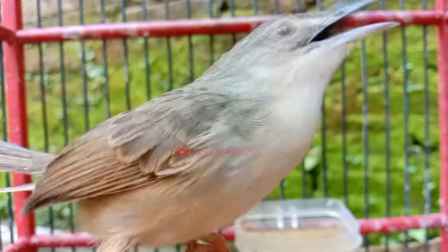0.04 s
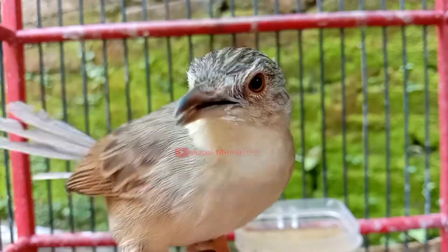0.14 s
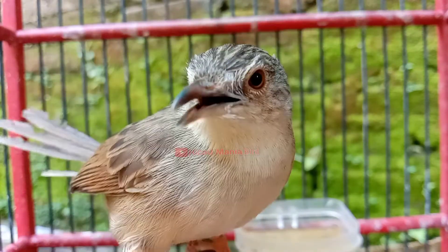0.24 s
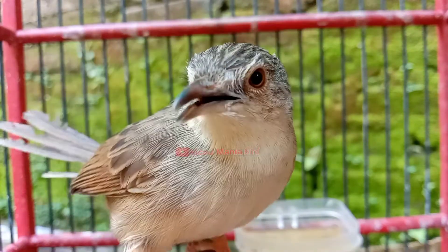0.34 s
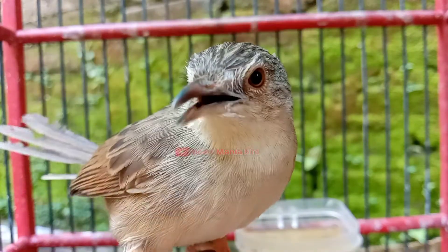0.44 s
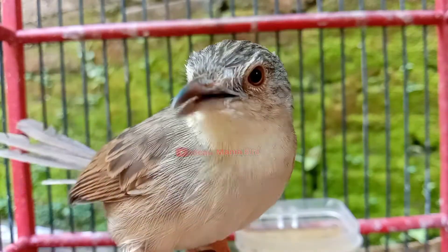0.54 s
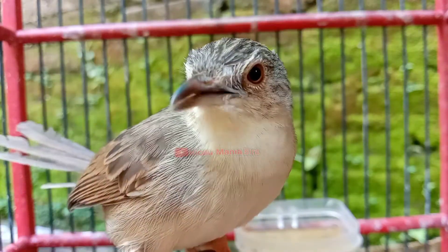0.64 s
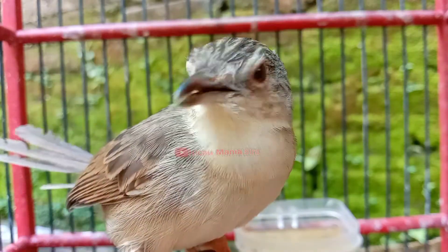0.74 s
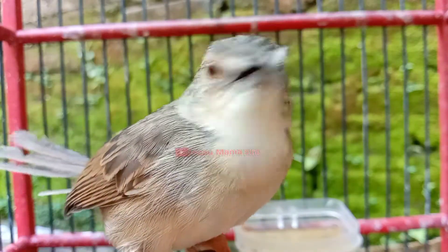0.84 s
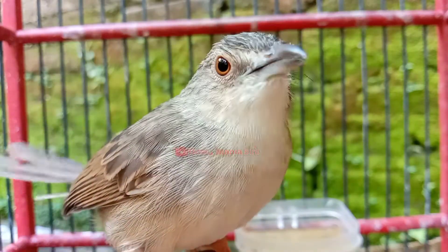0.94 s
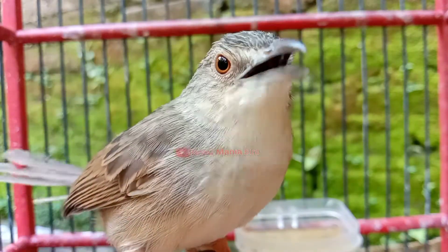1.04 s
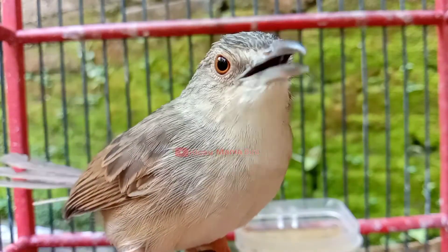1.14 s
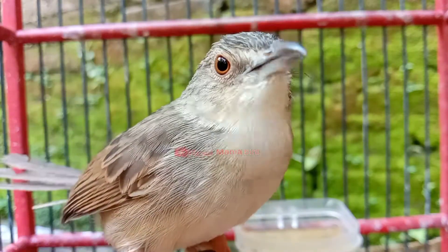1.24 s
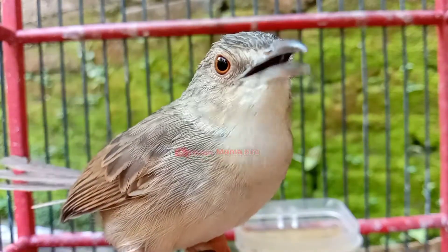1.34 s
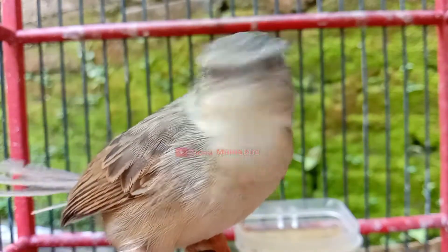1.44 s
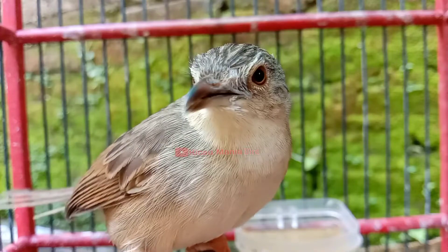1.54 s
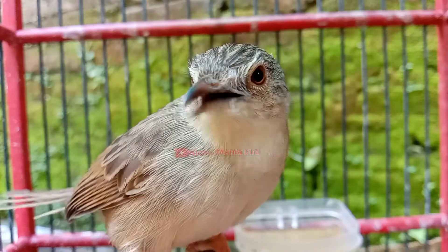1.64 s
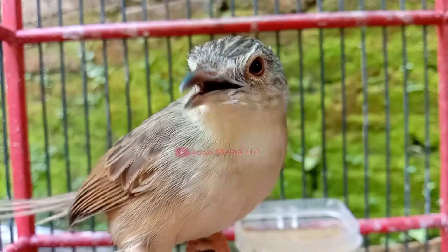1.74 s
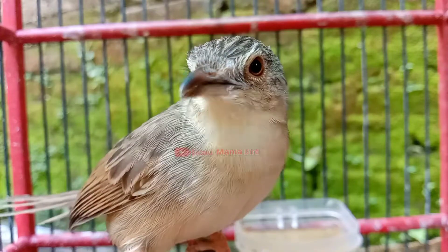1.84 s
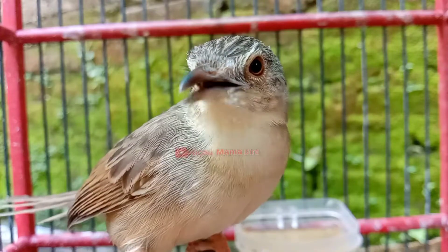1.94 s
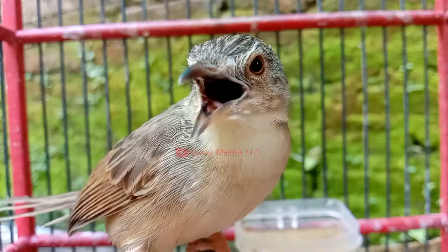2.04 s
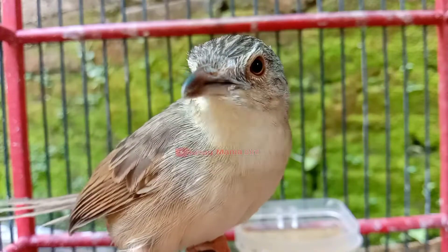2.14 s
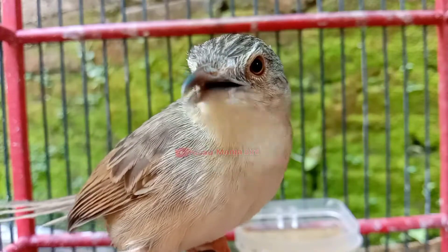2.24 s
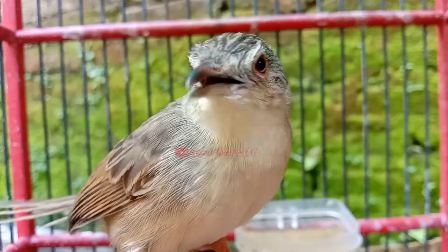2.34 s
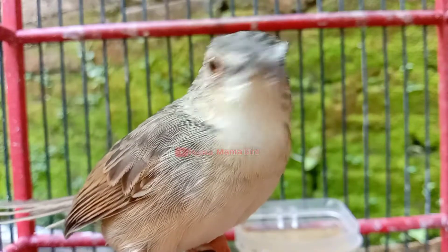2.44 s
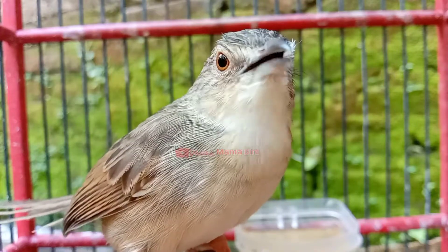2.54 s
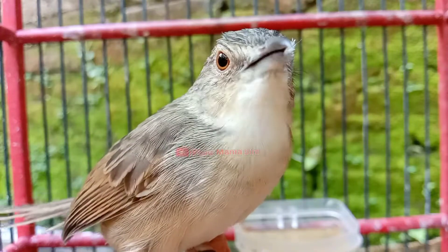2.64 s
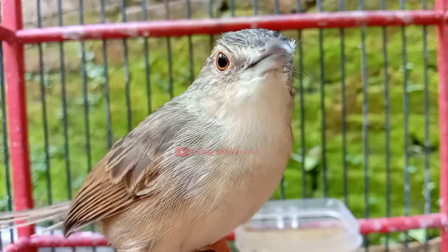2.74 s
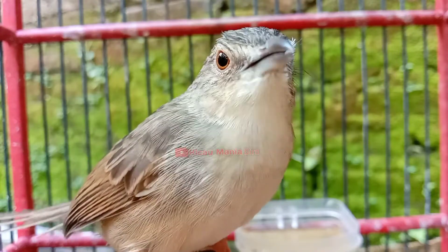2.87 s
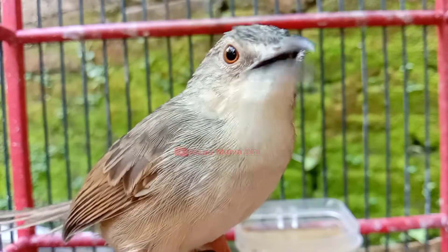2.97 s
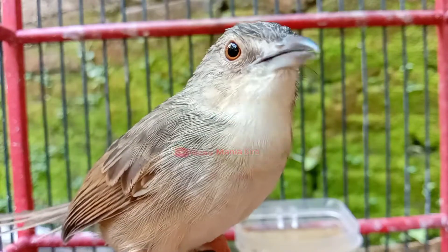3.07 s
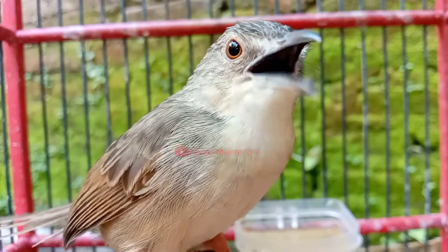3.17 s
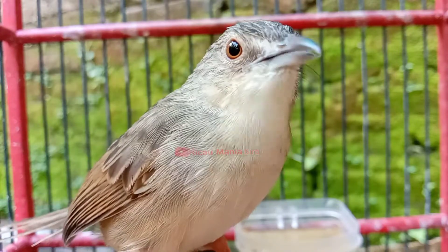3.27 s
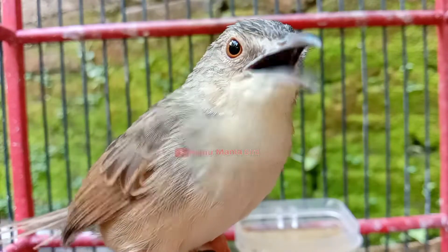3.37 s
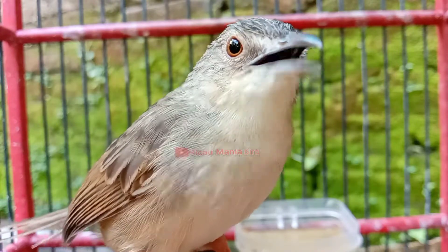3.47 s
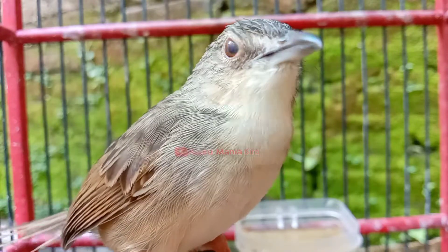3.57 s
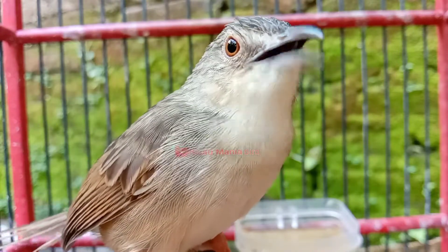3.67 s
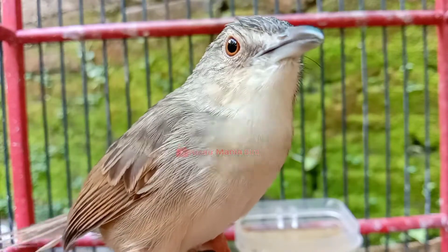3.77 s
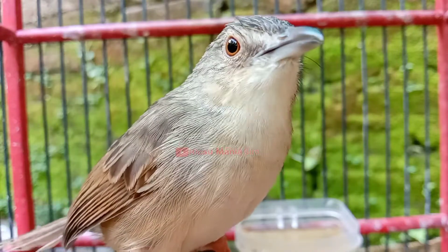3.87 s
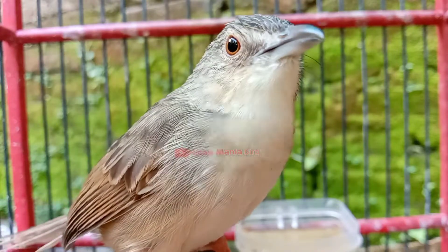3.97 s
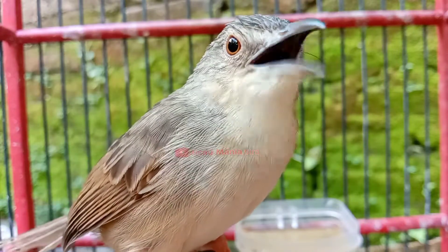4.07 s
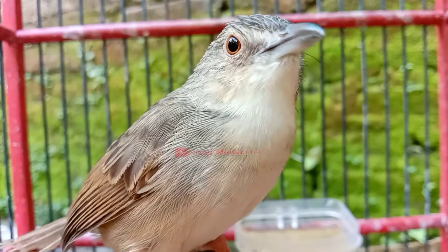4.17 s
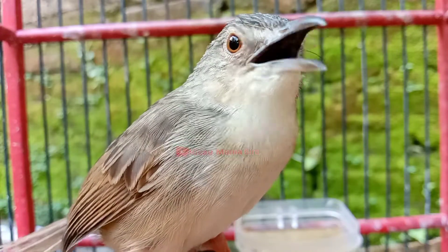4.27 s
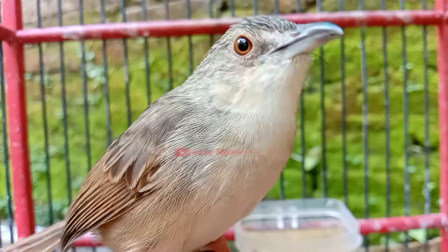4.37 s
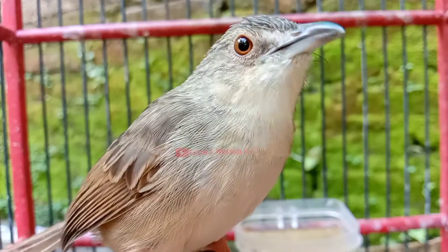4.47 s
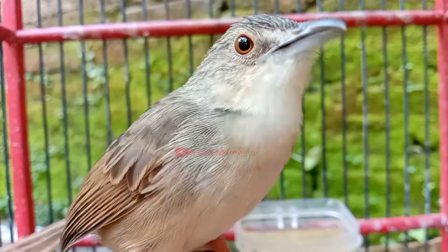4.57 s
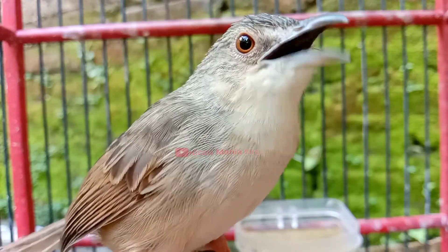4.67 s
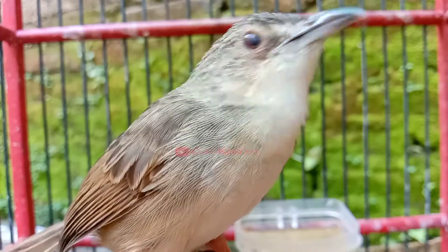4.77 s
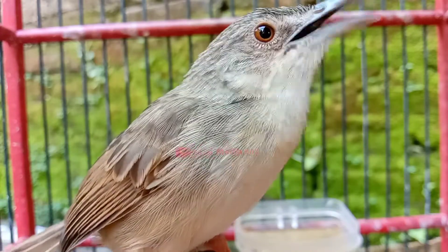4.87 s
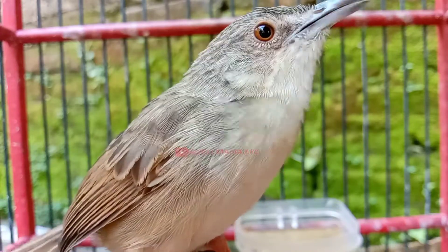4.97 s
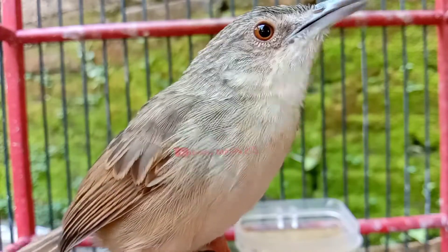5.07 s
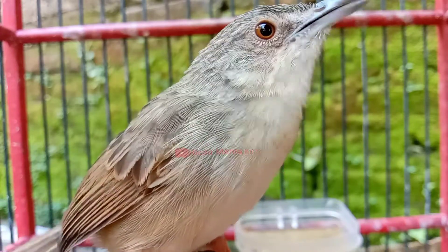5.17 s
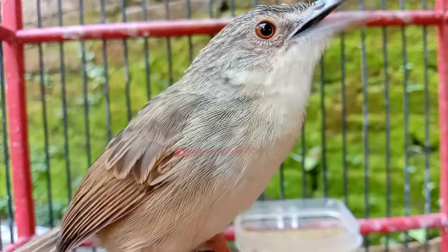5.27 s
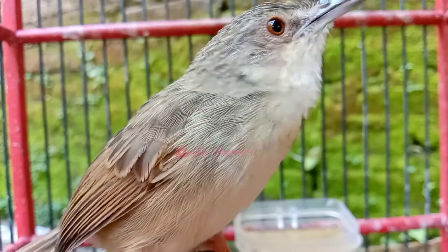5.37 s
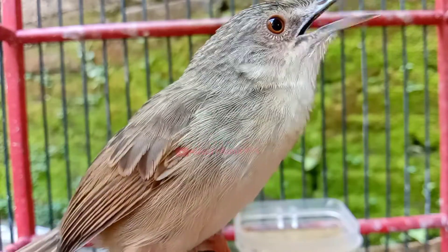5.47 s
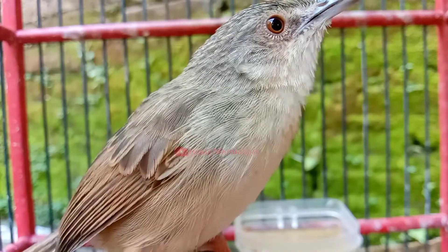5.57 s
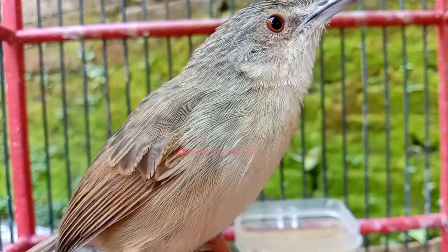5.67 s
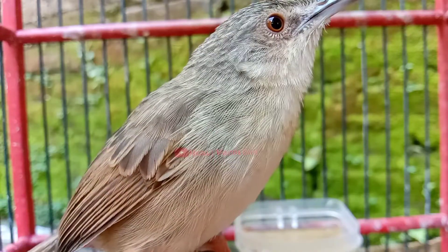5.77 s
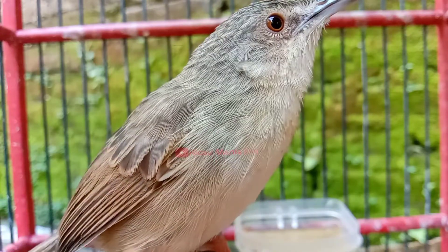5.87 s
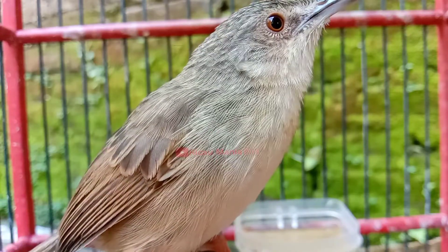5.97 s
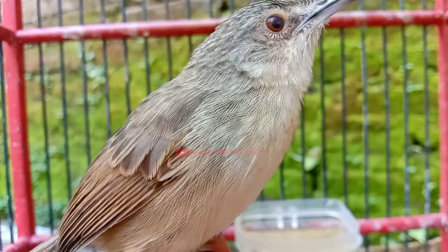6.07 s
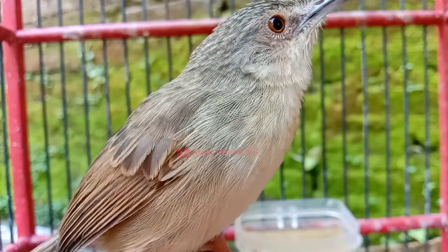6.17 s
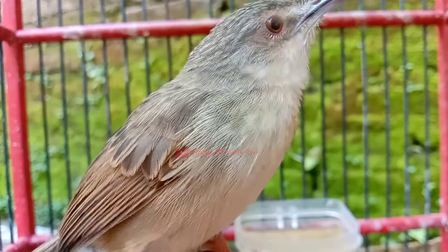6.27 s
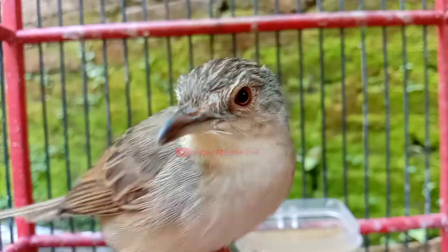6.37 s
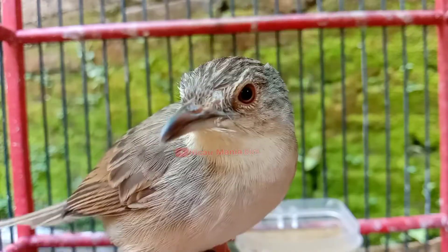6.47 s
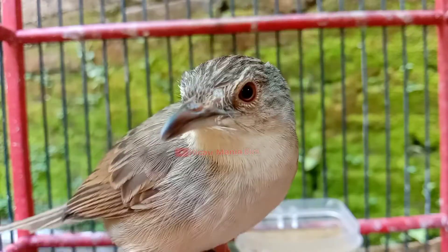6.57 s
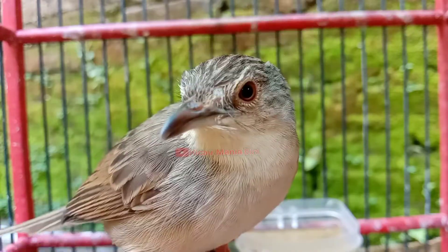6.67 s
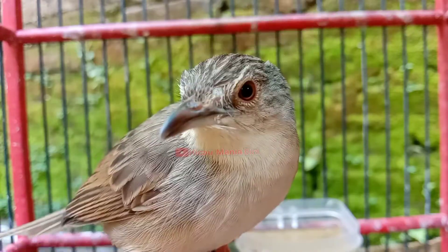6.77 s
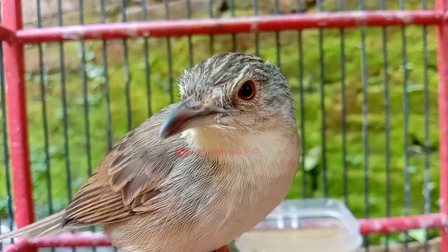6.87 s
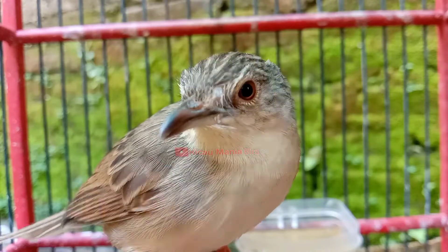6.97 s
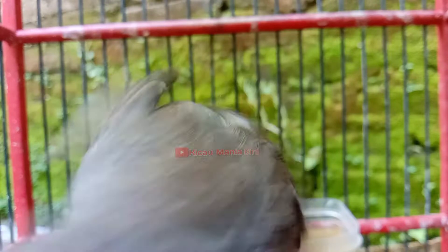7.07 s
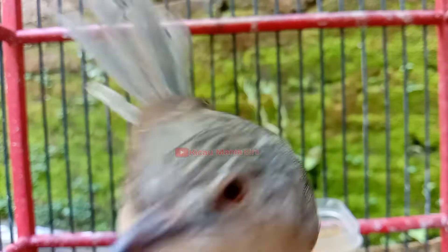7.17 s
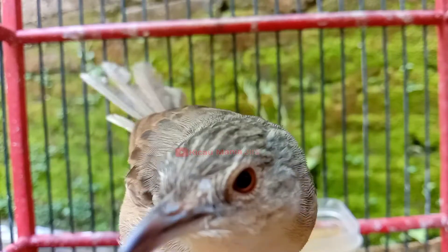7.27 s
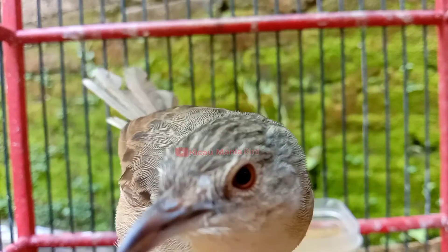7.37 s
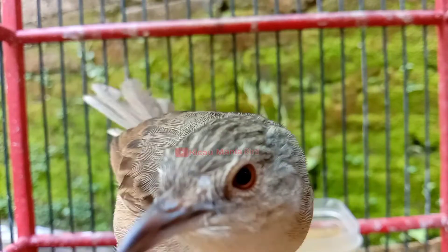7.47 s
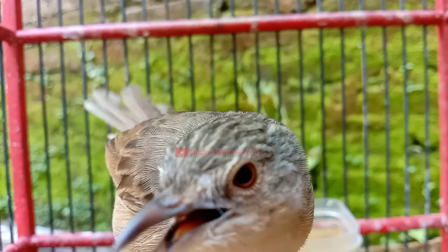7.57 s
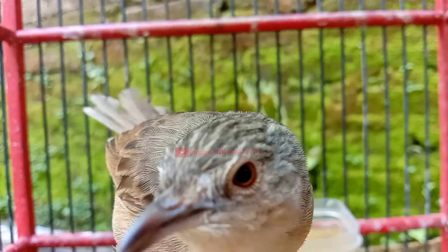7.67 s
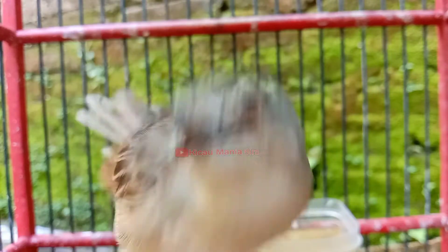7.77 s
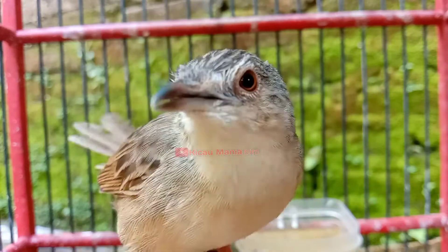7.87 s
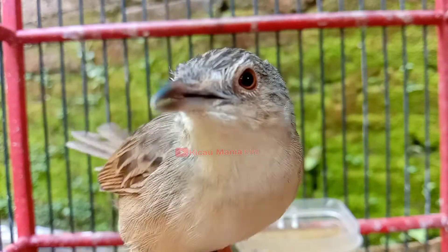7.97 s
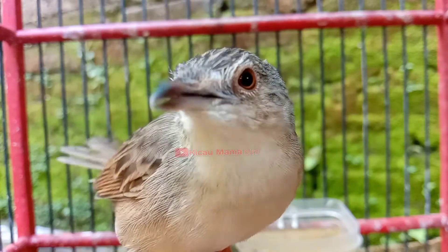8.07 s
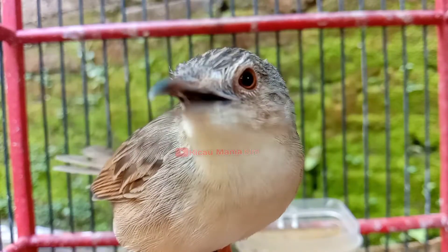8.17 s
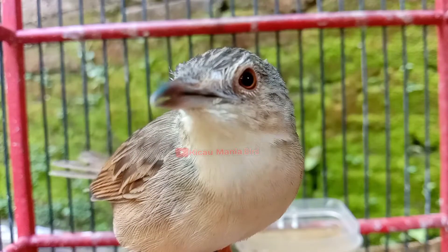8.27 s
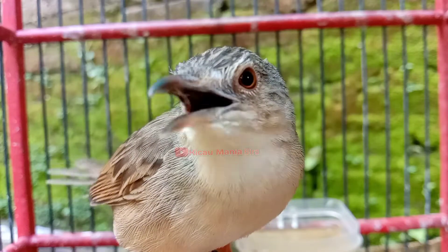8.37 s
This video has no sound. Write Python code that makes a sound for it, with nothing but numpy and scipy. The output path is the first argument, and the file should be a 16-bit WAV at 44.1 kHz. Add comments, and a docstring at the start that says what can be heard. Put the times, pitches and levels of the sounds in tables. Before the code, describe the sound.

In a yard beside a street, a phone's microphone sits close to a small caged bird. The sound opens on the tail of a phrase, its buzz ending near 0.2 s. From 0.5 s the phrase returns about every 0.6 s: a falling click-like chip, a slur darting up and down, then a rising whistle breaking into a harsh, rapid buzz around 5 kHz. It is loud, piercing, slightly clipped, with short cage and wall echoes. Low traffic rumble and faint hums waver behind; a soft hiss passes early, and a rough far call hides near 1.6 s. The run ends around 5.6 s. Feathers flutter briefly at 5.7 s, a faint pulsing far whistle sounds at 6.5 s, and feet tap and scrape the wooden perch, lightly at 6.4, more clearly from 6.9 to 7.2 s. A softer phrase comes at 7.4 s, a stronger one at 8.0 s, cut off as its buzz finishes.

```python
"""A yard beside a street, a phone's microphone close to a small caged bird that repeats one phrase: a falling chip,
a slur up and down, a rising whistle that breaks into a buzz. The notes are gliding partials; delays and a noise
tail make the echoes of cage and walls, and the loudest notes clip. Behind: knocks of the perch and shaken feathers
(noise through resonances and spectra), a far bird (wavering tones), traffic rumble and a passing hiss (shaped
noise), and wavering hums (sines)."""
import sys
import numpy as np
from scipy import signal
from scipy.fft import rfft, irfft, next_fast_len
from scipy.io import wavfile
from scipy.ndimage import uniform_filter1d, map_coordinates

SR = 44100
rng = np.random.default_rng(int(sys.argv[2]) if len(sys.argv) > 2 else 0)


def put_to_file(sound):
    """Save the sound as 16-bit audio at rate SR, in the file named by the first command-line argument."""
    columns = np.atleast_2d(sound).T  # one column per channel
    safe = np.clip(columns, -1, 1)
    whole_steps = np.round(safe * 32767)
    wavfile.write(sys.argv[1], SR, whole_steps.astype(np.int16))


N = 370881  # samples


def amp(db):
    """Level in dB to linear gain."""
    return 10 ** (np.asarray(db) / 20)


def unit(x):
    """x scaled to rms 1."""
    return x / np.sqrt(np.mean(x ** 2) + 1e-20)


def along(points, hz):
    """Reads (f/Hz, value) points on a log frequency axis."""
    f, v = np.transpose(points)
    return np.interp(np.log(hz + 1), np.log(f + 1), v)


def curves(rows, t):
    """Each column after the time, read at times t."""
    s, *cols = np.transpose(rows)
    return [np.interp(t, s, c) for c in cols]


def wobble(rate, size=N):
    """A smooth random curve, rate knots a second."""
    knots = rng.standard_normal(size=500)
    return map_coordinates(knots, [np.arange(size) * rate / SR], mode="wrap")


def filtered(x, response):
    """x times a complex response of frequency."""
    m = next_fast_len(N + SR // 2)
    return irfft(rfft(x, m) * response(np.fft.rfftfreq(m, 1 / SR)), m)[..., :N]


def rush(spectrum, patchy_db):
    """Noise of rms 1 in a given spectrum, with patches of random gain in time and frequency."""
    z = signal.stft(rng.standard_normal(N + 512), nperseg=512)[2]
    field = uniform_filter1d(rng.standard_normal(z.shape), 4, 0)  # across frequency
    field = uniform_filter1d(field, 14, 1)  # across time
    noise = signal.istft(z * amp(patchy_db * unit(field)), nperseg=512)[1][:N]
    return unit(filtered(noise, lambda hz: amp(along(spectrum, hz))))


def add(out, s, x):
    """Mixes x into out from time s on."""
    i = round(s * SR)
    part = x[max(-i, 0):len(out) - i]
    out[max(i, 0):][:len(part)] += part


# The four notes, close to the microphone; phrase and note gains are added to the levels. Columns:
# t/s from the note's moment, strong partial f/Hz, its level/dB, weak partials' level/dB relative to it
CHIP = [(-.006, 8011, -48.5, -39.5), (-.003, 7657, -21.5, -38), (0, 6537, -8, -37), (.004, 5246, -4, -39),
        (.008, 4150, -2.5, -35), (.018, 2097, -26.5, -44), (.025, 1287, -47, -50), (.03, 1118, -78, -40)]  # t from the chip
SLUR = [(-.024, 2004, -85.5, -15), (-.019, 2504, -43, -3.5), (-.014, 3685, -15.5, -12),
        (-.009, 5215, -11.5, -20), (-.003, 7377, -8.5, -32.5), (.003, 7528, -9, -34.5),
        (.015, 6590, -8.5, -33.5), (.035, 4404, -19, -13.5), (.048, 3650, -13, -15.5),
        (.065, 3063, -15.5, -32), (.08, 2800, -21, -13.5), (.091, 2503, -24, -12.5),
        (.098, 1963, -36.5, -12.5), (.106, 1415, -65.5, -21.5)]  # t from the slur's top
RISE = [(-.08, 1312, -54, -12.5), (-.0715, 1999, -31.5, -18), (-.0655, 2494, -24, -17.5),
        (-.0575, 2944, -14, -27.5), (-.0495, 3250, -11, -27.5), (-.0375, 3485, -12, -21),
        (-.0265, 3925, -9, -22), (-.0185, 4674, -16, -16), (-.0125, 5470, -13, -13.5)]  # t from the buzz beat
BUZZ = [(-.0095, 5050, -10, -24), (.0075, 5320, -5.5, -27.5), (.03, 5433, -3.5, -29.5),
        (.045, 5050, -5, -28.5), (.062, 3900, -6, -26.5), (.078, 3000, -15.5, -25.5),
        (.0885, 2250, -30.5, -17), (.0985, 2000, -69, -36)]  # t from the buzz beat at the usual warble rate; f is the warble's centre
# Weak partials: multiple of the strong one's f, level/dB added to the weak level of the note
WEAK_PARTIALS = [(.5, -5.5), (1.5, -4), (2, -9.5), (2.5, -43.5), (3, -42)]
# Extra level/dB of the weak partials above the strong one: chip, slur, rise, buzz
UPPER_DB = [-4.8, 5, -7.5, 12]
# The throat passes the upper partials: f/Hz, gain/dB
THROAT = [(2500, -7.5), (3500, 1), (4400, 0), (5500, -6.5), (6700, 2.6), (7600, -17.5), (12000, -19.5)]
USUAL_WARBLES = 121.5  # per s
WARBLE_SHARE, WARBLE_GATE_DB = 0.22, 16.5  # scale of the pitch swing over pitch, level dip of each beat
WARBLE_JITTER = .2  # radians


def phrase(top, beat, rate, *notes_db):
    """Four notes, each hung on its own moment; in the buzz the pitch saws down loud and climbs back faint."""
    t = np.arange(SR // 2) / SR - .01  # s from the chip
    buzz = [(s * USUAL_WARBLES / rate, *rest) for s, *rest in BUZZ]  # a slower warble draws the buzz out
    rows = []
    for shape, at, gain, up in zip([CHIP, SLUR, RISE, buzz], [0, top, beat, beat], notes_db, UPPER_DB):
        rows += [(at + s, f, db + gain, under, under + up) for s, f, db, under in shape]
    hz, db, under_db, upper_db = curves(rows, t)

    buzzing = np.interp(t - beat, [RISE[-1][0], BUZZ[0][0]], [0, 1])
    beat_phase = 2 * np.pi * rate * (t - beat) + 1.3 + WARBLE_JITTER * wobble(70, size=len(t))
    saw = np.cos(beat_phase) - 0.34 * np.sin(2 * beat_phase)
    dip_db = WARBLE_GATE_DB * (np.sin(beat_phase - .1) - 1) / 2
    gate_db = buzzing * (dip_db + 0.93 * wobble(400, size=len(t)))

    bend = 1 + .006 * wobble(300, size=len(t)) + buzzing * WARBLE_SHARE * saw
    phase = 2 * np.pi * np.cumsum(hz * bend) / SR
    voice = np.sin(phase)
    for k, level in WEAK_PARTIALS:
        weak_db = upper_db + along(THROAT, k * hz) if k > 1 else under_db
        voice = voice + amp(weak_db + level) * np.sin(k * phase) * (k * hz < SR / 2.5)
    return amp(db + gate_db + 1.1 * wobble(120, size=len(t))) * voice


# The yard's reverberation: f/Hz, t60/s before the scale given by each use
YARD = [(1000, 0.14), (3000, .35), (5000, 0.37), (6200, 0.36), (7500, 0.27), (10000, 0.052)]


def tail(x, t60_scale):
    """Decaying noise as the yard's answer: each frequency dies at its own speed."""
    hz, t, z = signal.stft(rng.standard_normal(SR // 2), SR, nperseg=128)
    z = z * amp(-60 * t / (t60_scale * along(YARD, hz)[:, None]))
    answer = signal.istft(z, SR, nperseg=128)[1]
    late = np.pad(x, (170, 0))  # starts 170 samples late
    return signal.fftconvolve(late, answer / np.linalg.norm(answer))


# The phrases: chip t/s, slur top t/s after it, buzz beat t/s after it, warble rate/per s,
# gains of chip, slur, rise and buzz/dB, thump drive level/dB
SONG = [(-0.285, .12, .3091, 123.0, 0.0, 0.0, 0.0, -0.7, -60),
        (0.4887, .1222, .3097, 122.0, -1.7, -2.9, -0.7, -0.1, -56),
        (1.0822, .1228, .3073, 120.5, 0.8, 1.2, 2.2, 0.9, -44),
        (1.6932, .1242, .3111, 122.0, -0.6, 0.3, 2.2, 0.8, -41),
        (2.2661, .1222, .312, 125.5, -0.4, 0.1, 1.8, 0.6, -49),
        (2.8331, .121, .3098, 120.5, -0.1, 1.1, 0.9, 0.2, -50),
        (3.3963, .12, .3074, 119.0, 0.0, 0.0, 0.0, 0.0, -51),
        (3.9643, .1239, .3131, 122.0, -0.2, 0.0, -0.5, -0.2, -49),
        (4.5556, .1247, .3189, 120.0, -0.6, -0.2, -0.4, -0.8, -49),
        (5.127, .1253, .3159, 117.0, -0.7, 1.2, -0.8, -0.9, -54),
        (7.4354, .1471, .3345, 124.5, -4.1, -6.5, -5.8, -1.6, -60),
        (8.034, .1262, .3166, 122.5, -1.0, -2.9, -3.0, -1.6, -54)]
# Near echoes off cage, perch and table: delay/ms, signed share of the direct sound
ECHOES = [(0.391, 0.043), (0.739, 0.056), (0.944, -0.31), (1.204, 0.26), (1.421, 0.25), (2.414, 0.19),
          (2.824, 0.17), (3.152, 0.31), (3.512, -0.21), (4.85, 0.16)]
# Treble noise on the high notes: f/Hz, relative density/dB per Hz
SPLASH = [(6500, -34), (7800, -6), (10000, -2.5), (11500, -2.5), (13000, -6.5), (15000, -3.5),
          (16000, -14.5)]
# The low thump under each chip: f/Hz, relative density/dB per Hz
THUMP_TONE = [(200, -30), (380, -6), (550, -4), (750, 0), (1000, -6), (1500, -12), (2500, -40)]
THUMP_S = .022


def singer():
    """All phrases with fixed near echoes, the yard's tail, treble noise on high notes, a thump under each chip."""
    direct, wet, thump = np.zeros((3, N))
    for chip, *row, thump_db in SONG:
        add(thump, chip - THUMP_S / 2, amp(thump_db) * np.hanning(round(THUMP_S * SR)))
        notes = phrase(*row)
        answer = amp(-17.5) * tail(notes, t60_scale=0.57) + amp(-28) * tail(notes, t60_scale=0.98)
        add(direct, chip - .01, notes)
        add(wet, chip - .01, answer)

    def near(hz):
        """Direct sound plus its delayed copies."""
        return 1 + sum(share * np.exp(-2j * np.pi * hz * ms / 1000) for ms, share in ECHOES)

    song = filtered(direct, near) + wet
    high = filtered(song, lambda hz: 1 / (1 + (4800 / (hz + 1)) ** 8))
    loudness = np.sqrt(np.abs(uniform_filter1d(high ** 2, size=350)))
    splash_level = amp(-30.5) * loudness ** 0.87 * amp(2.5 * wobble(13))
    splash = splash_level * rush(SPLASH, patchy_db=5)
    return song + splash + thump * rush(THUMP_TONE, patchy_db=2.5)


# Feet on the perch: t/s, drive level/dB before the wood's response, rustle level over it/dB
KNOCKS = [(6.4424, -43, -24), (6.8551, -34, -22), (6.8749, -37, -25.5), (7.078, -26, -27),
          (7.0903, -25.5, -16.5), (7.1325, -48.5, -23), (7.1721, -38, -30.5), (7.2481, -46, -36)]
# Resonances of the perch: f/Hz, width/Hz, gain/dB
PERCH = [(796, 39, -6.5), (1304, 83, 3), (1460, 46, -2.5), (1790, 100, -3.5), (2060, 160, -11.5),
         (2400, 120, -12), (3880, 490, -10.5)]
KNOCK_T60_S = 0.12  # of the scrape; the rustle dies twice as fast


def knocks():
    """Feet scrape the perch: noise bursts ring its resonances, with a dry rustle."""
    scrape, rustle, t = np.zeros(N), np.zeros(N), np.arange(SR // 8) / SR
    for s, db, rustle_db in KNOCKS:
        fade = amp(-60 * t / KNOCK_T60_S)
        shape = amp(db) * fade * (1 - np.exp(-t / .002))
        add(scrape, s, shape * rng.standard_normal(len(t)))
        add(rustle, s, amp(rustle_db) * fade * shape * rng.standard_normal(len(t)))

    def wood(f):
        """Resonances in parallel, with alternating sign."""
        return sum((-1) ** k * amp(db) * 1j * f * width / (centre ** 2 - f * f + 1j * f * width)
                   for k, (centre, width, db) in enumerate(PERCH))

    return filtered(scrape, wood) + filtered(rustle, lambda f: f / (f + 1500))


# Feathers shaken once: start t/s, end t/s, mean level/dB
RUFFLE = (5.69, 5.86, -59)
# Their spectrum: f/Hz, relative density/dB per Hz
RUFFLE_TONE = [(900, -27.5), (1500, -19), (2000, 4), (2800, -2), (3700, 8), (4500, -9), (5750, 4),
               (7500, -14), (10000, -16), (15500, -27)]


def feathers():
    """One shake of the feathers: a short burst of patchy noise with an unsteady level."""
    start, end, db = RUFFLE
    shake = np.interp(np.arange(N) / SR, [start, start + 0.015, end - .03, end], [0, 1, 1, 0])
    return amp(db + 3 * wobble(49)) * shake * rush(RUFFLE_TONE, patchy_db=4.5)


# Far whistle: t/s, f/Hz, level/dB about which it pulses
FAR_WHISTLE = [(6.488, 2500, -50), (6.497, 2850, -39), (6.512, 2980, -37), (6.535, 3110, -32),
               (6.565, 3070, -38), (6.6, 3095, -38), (6.652, 3100, -52), (6.76, 3110, -70)]
# Its overtones: multiple of f, level under the whistle at its start/dB, fading/dB per s
FAR_OVERTONES = [(2, -14, 150), (3, -36, 150)]
# Rough far call, a low note then a higher one: t/s, f/Hz, level/dB about which it flutters
CHATTER = [(1.53, 2250, -56), (1.56, 2230, -44), (1.618, 2220, -46), (1.626, 2830, -40), (1.666, 2800, -36),
           (1.695, 2830, -35)]
FAR_PULSES, FAR_PULSE_DB, FAR_PULSE_S = 33, 4, 6.548  # per s, swing either way, moment of one crest
FAR_WAVER = .009  # pitch share


def far_birds():
    """A pulsing whistle whose overtones fade first, smeared by the yard, and a fluttering rough call."""
    out = np.zeros(N)
    t = np.arange(SR // 3) / SR + FAR_WHISTLE[0][0]
    hz, db = curves(FAR_WHISTLE, t)
    phase = 2 * np.pi * np.cumsum(hz * (1 + FAR_WAVER * wobble(110, size=len(t)))) / SR
    tone = np.sin(phase)
    for k, under, fade in FAR_OVERTONES:
        tone = tone + amp(under - fade * (t - t[0])) * np.sin(k * phase)
    pulse_db = FAR_PULSE_DB * np.cos(2 * np.pi * FAR_PULSES * (t - FAR_PULSE_S))
    onset = 1 - np.exp((t[0] - t) / 0.0034)
    whistle = amp(db + pulse_db) * (t < FAR_WHISTLE[-1][0]) * tone * onset
    add(out, t[0], whistle)
    add(out, t[0], amp(-7) * tail(whistle, t60_scale=0.44))

    t = np.arange(SR // 6) / SR + CHATTER[0][0]
    hz, db = curves(CHATTER, t)
    # fast random pitch makes the call rough
    phase = 2 * np.pi * np.cumsum(hz * (1 + 0.058 * wobble(698, size=len(t)))) / SR
    flutter_db = 3.9 * np.cos(2 * np.pi * 70 * t)
    add(out, t[0], amp(db + flutter_db) * np.sin(phase) * np.hanning(len(t)) ** 0.073)
    return out


# Street traffic: t/s, mean level/dB of rumble, of drone, of wash
TRAFFIC = [(0, -49, -55.5, -57.5), (.4, -40, -52, -56.5), (.8, -46, -54, -57), (1.25, -48.5, -58, -54),
           (1.6, -41.5, -55, -54.5), (1.8, -50, -51, -55.5), (2.65, -49.5, -57, -56.5),
           (3.0, -50.5, -50, -52), (3.8, -47.5, -51.5, -56.5), (4.1, -44.5, -47, -53), (4.7, -48, -51, -49),
           (5.2, -47.5, -59, -57), (5.8, -50.5, -56.5, -60), (6.3, -43, -59.5, -65),
           (6.85, -47, -61, -65.5), (7.05, -54, -67.5, -66), (8.2, -47, -56, -63), (8.41, -45.5, -56, -65)]
# Spectra of the three: f/Hz, relative density/dB per Hz
RUMBLE = [(12, -64.5), (20, -39.5), (38, -20), (52, -10), (70, 1), (103, -5), (156, -5.5), (184, -12.5),
          (230, -11.5), (300, -39.5), (510, -120)]
DRONE = [(120, -31), (200, -11.5), (258, -4), (323, 1), (398, -2), (472, -14), (520, -14), (680, -45.5),
         (1140, -120)]
WASH = [(420, -32.5), (520, -9), (650, -5.5), (800, -9), (1000, -10), (1250, -1), (1400, -9.5),
        (1900, -8.5), (2500, -14), (3800, -27), (5500, -24), (7400, -24.5), (8000, -39), (15500, -35.5)]
# Passing hiss: t/s, mean level/dB
HISS = [(0, -49.5), (.15, -46.5), (.45, -40.5), (1.6, -63.5), (3, -56), (5.6, -63), (5.9, -77.5),
        (8.41, -83)]
# Its spectrum: f/Hz, relative density/dB per Hz
HISS_TONE = [(1350, -61), (2300, -25.5), (2700, -10.5), (3590, -0.5), (4520, -10), (5540, -15),
             (6360, -30.5), (7530, -31), (8200, -42.5), (9400, -36), (10800, -59.5), (16600, -120)]


def traffic():
    """Rumble, drone and wash of traffic and a passing hiss: noises in set spectra under moving levels."""
    t = np.arange(N) / SR
    rumble_db, drone_db, wash_db = curves(TRAFFIC, t)
    out = amp(rumble_db + 3.1 * wobble(6.3)) * rush(RUMBLE, patchy_db=0.5)
    out += amp(drone_db + 0.75 * wobble(6.6)) * rush(DRONE, patchy_db=5.5)
    out += amp(wash_db) * rush(WASH, patchy_db=4.0)
    hiss_db = curves(HISS, t)[0] + 1.2 * wobble(40)
    return out + amp(hiss_db) * rush(HISS_TONE, patchy_db=1.2)


# Background hums: start t/s, end t/s, first f/Hz, last f/Hz, level/dB about which they swell
HUMS = [(.05, .8, 160, 158, -40), (0.098, .45, 1240, 1230, -64), (0.159, .5, 350, 345, -69),
        (0.291, .85, 105, 104, -40), (0.723, 1.1, 430, 420, -50), (0.795, 1.2, 128, 130, -42),
        (0.932, 1.3, 645, 670, -58.5), (0.992, 1.25, 1050, 1090, -56.5), (1.2, 1.432, 354.4, 342, -53.5),
        (1.4, 1.75, 128, 127, -39.5), (1.654, 1.688, 1310, 1300, -40), (2.288, 2.6, 125, 128, -44.5),
        (2.902, 4.1, 77, 77, -48.5), (3.301, 3.9, 370, 320, -50), (3.87, 4.4, 395, 335, -48.5),
        (4.052, 5.103, 650, 645, -56.5), (4.703, 4.95, 920, 870, -55.5), (5.504, 6.5, 77, 77, -45.5),
        (6.676, 6.93, 1000, 1005, -64), (7.167, 7.24, 1830, 1740, -68), (7.23, 7.3, 1410, 1400, -63),
        (7.386, 8.41, 76, 75, -45)]
HUM_WAVER, HUM_SWELL_DB = .01, 3.5  # scales of the random pitch share and level


def hums():
    """Gliding sines whose pitch wavers and whose level swells at random."""
    out = np.zeros(N)
    for start, end, first_hz, last_hz, db in HUMS:
        n = round((end - start) * SR)
        hz = np.linspace(first_hz, last_hz, n) * (1 + HUM_WAVER * wobble(21, size=n))
        level = amp(db + HUM_SWELL_DB * wobble(12, size=n)) * np.hanning(n) ** 0.23
        add(out, start, level * np.sin(2 * np.pi * np.cumsum(hz) / SR))
    return out


def scene():
    """Near bird and cage, then the far birds and the street, on one channel."""
    return (singer() + knocks() + feathers() + far_birds() + traffic() + hums())[None]


# Overtones and low tones of the squared sound: f/Hz, gain/dB
SQUARED_TONE = [(100, -50), (500, -36), (1500, -44.5), (5000, -38.5), (8000, -29), (11000, -23.5),
                (15000, -19)]
TOP_HZ = 15700  # band limit


def record(dry):
    """The squared sound adds sum and difference tones, the input clips, the band limit cuts the top."""
    x = dry + filtered(dry ** 2, lambda hz: amp(along(SQUARED_TONE, hz)))
    x = x / (1 + np.abs(x / .99) ** 12) ** (1 / 12)  # clips with a slightly rounded knee
    return filtered(x, lambda hz: hz < TOP_HZ)


dry = scene()
out = record(dry)
put_to_file(out)
```